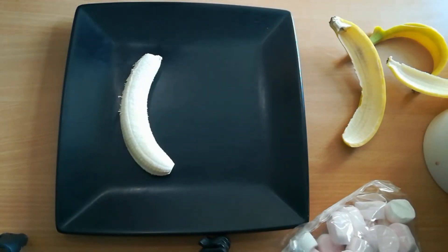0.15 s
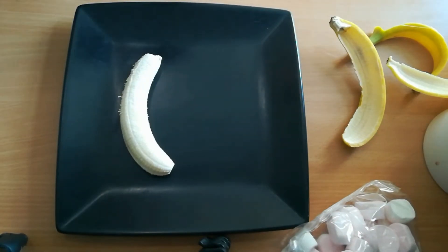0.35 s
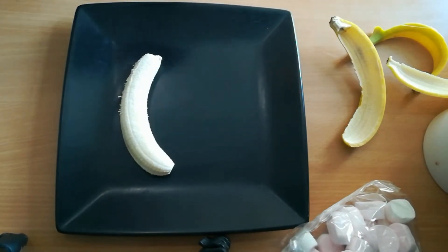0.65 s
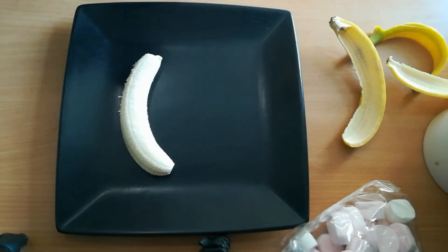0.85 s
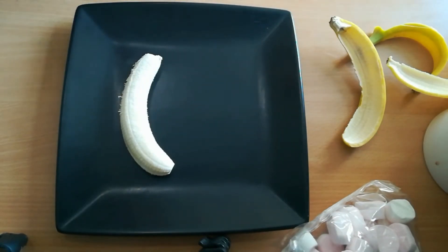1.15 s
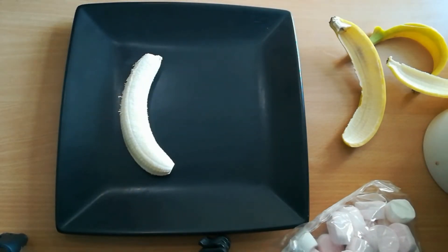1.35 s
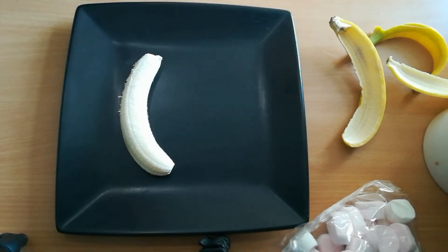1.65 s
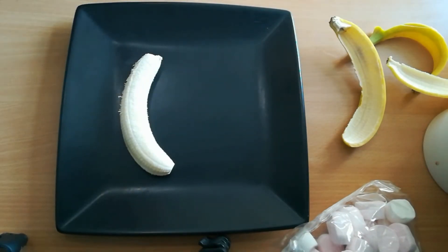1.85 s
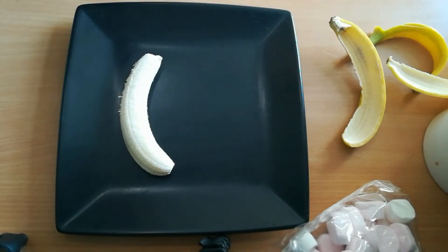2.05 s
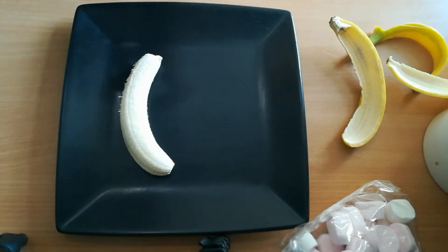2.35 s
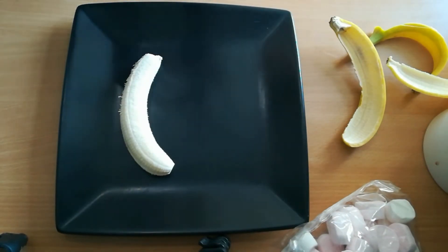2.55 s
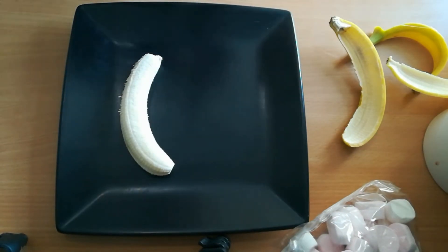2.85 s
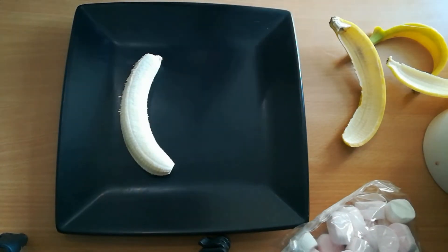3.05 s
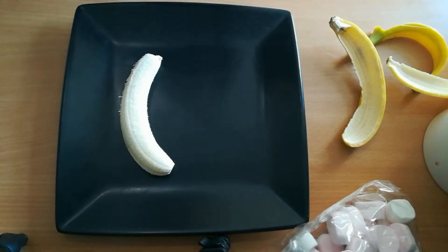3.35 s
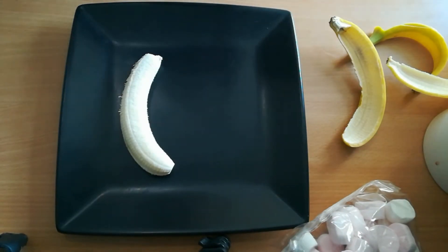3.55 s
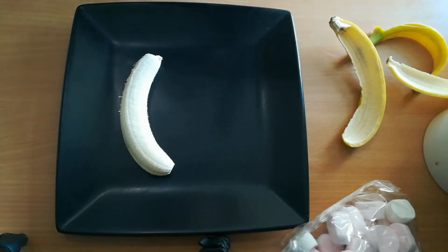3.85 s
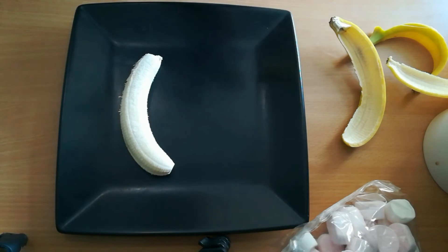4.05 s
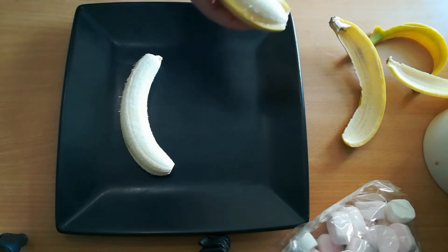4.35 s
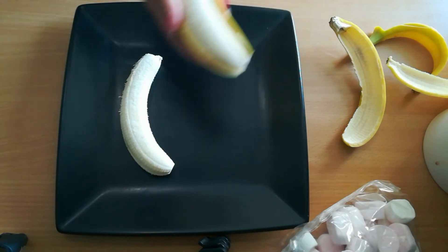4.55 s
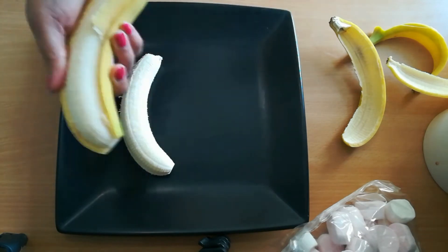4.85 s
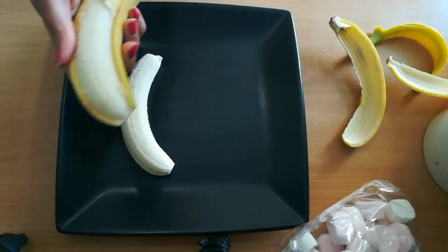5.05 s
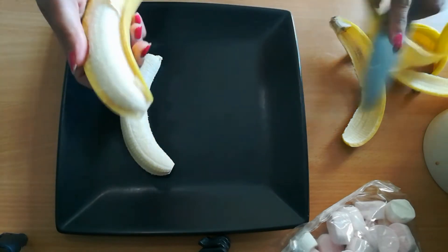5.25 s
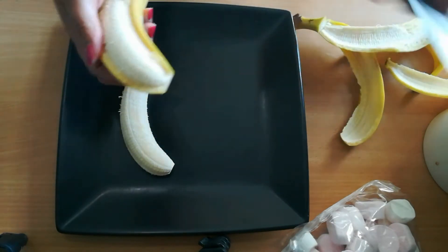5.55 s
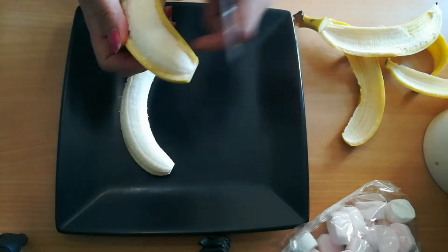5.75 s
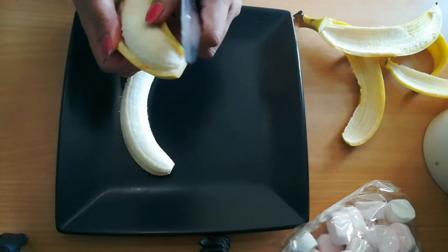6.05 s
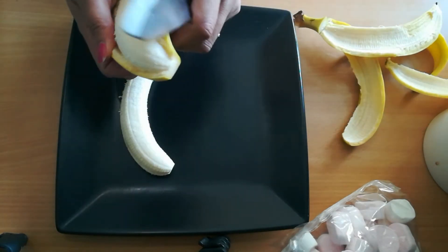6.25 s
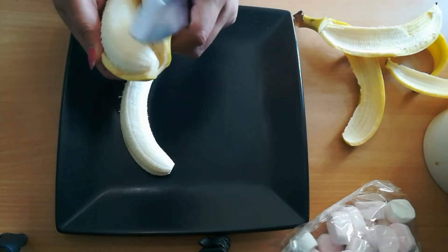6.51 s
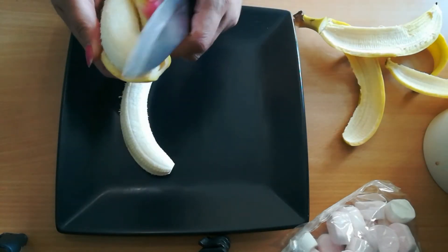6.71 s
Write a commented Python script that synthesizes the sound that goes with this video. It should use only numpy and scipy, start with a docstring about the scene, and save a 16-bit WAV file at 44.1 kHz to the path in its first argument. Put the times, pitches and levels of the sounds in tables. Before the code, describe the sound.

A wooden drawer rumbles open, cutlery clinks, the drawer bangs shut loudly with a jingle, then a banana peel snaps and tears close by.

```python
"""A cutlery drawer is pulled open, a knife is drawn out and the drawer is knocked shut at a kitchen table.
The cutlery jingles and a spoon rocks to rest; close by, a banana skin cracks and tears, a knife ticks
lightly as it is put to the fruit, and an appliance hums faintly. Knocks and snaps are short noise bursts,
wood and steel are decaying modes, rubbing and tearing are random grains under stroke envelopes,
and every handled object sounds in one kitchen reverb."""
import sys
import numpy as np
from scipy import signal
from scipy.fft import rfft, irfft
from scipy.io import wavfile

SR = 44100
rng = np.random.default_rng(int(sys.argv[2]) if len(sys.argv) > 2 else 0)


def transcribe(u):
    """Save the signal u as a 16-bit wav file named by the first command-line argument.

    u: samples, shape (n,) or (channels, n), limited to [-1, 1]; the rate is SR.
    q: integer samples, one column per channel.
    """
    v = np.clip(np.atleast_2d(u).T, -1, 1)
    q = np.round(v * 32767).astype(np.int16)
    wavfile.write(sys.argv[1], SR, q)


N = 303275
TIME = np.arange(N) / SR   # seconds
AGE = TIME[:SR]   # seconds since a blow

# Still air, spectral shape. Each row: frequency in Hz, level in dB.
AIR_COLOUR = [(20, 0), (32, -11.5), (48, -0.5), (75, -12.5), (100, -10.5), (122, -4), (168, -8.5),
              (205, -16.5), (300, -20), (700, -22), (1400, -25.5), (2600, -27), (5000, -31), (15000, -36.5)]
AIR_DB = -65
# Hum of the appliance. Each row: frequency in Hz, RMS level in dB.
HUM_TONES = [(123.8, -70.5), (161.5, -71.5), (877.5, -83.5)]
# Rumble of the furniture under the hands. Each row: peak time in seconds, level in dB, half width in seconds.
RUMBLES = [(0.1, -49, .13), (0.45, -35.5, .08), (0.77, -53, .035), (0.87, -56, .13), (1.11, -62, .09),
           (1.5, -60, .07), (5.33, -62, .03), (6.23, -50.5, .13), (6.52, -53.5, .11), (6.82, -59, .1)]
# Furniture rumble, spectral shape. Each row: frequency in Hz, level in dB.
TABLE_COLOUR = [(12, -30.5), (20, 4), (76, -13), (124, 3), (169, -4.5), (195, -18), (246, -16), (285, -22),
                (826, -27.5), (888, -26.5), (1500, -32.5), (1950, -59), (3300, -120)]

# Reverb decay of the kitchen. Each row: frequency in Hz, T60 in seconds.
ROOM_T60 = [(100, .6), (300, 0.47), (1000, 0.37), (3000, 0.35), (6000, 0.29), (15000, 0.22)]
# Stereo likeness of diffuse sound. Each row: frequency in Hz, left-right correlation from -1 to 1.
STEREO_LIKENESS = [(40, 1), (130, 0.63), (300, .45), (550, -.3), (1200, -0.084), (3000, 0), (15000, 0.18)]

# Drawer hits its frame. Each row: start in seconds, knock in dB, treble relative to knock in dB,
# thump in dB, bass relative to thump in dB, rattle T60 in seconds.
KNOCKS = [(0.138, -16, -11.5, -17, -2, .14), (0.218, -25.5, 1.5, -28, -4, .04),
          (0.306, 6.5, 5, -1.5, -4, .11), (0.319, 1.5, -1.5, 10, -.5, .13), (0.526, -29.5, 3, -19, 0, .035),
          (1.079, -27, 0, -32, -4, .018), (1.761, 11, -5, 3.5, -8, .023), (1.867, 1.5, -10.5, -8, -2, .012),
          (1.888, -.5, -8.5, -9, -2, .02), (1.941, 15.5, 0, 8, 0, .025), (1.964, 6, 8.5, 7, 2, .05),
          (2.011, 1.5, -2, 2, 3, .08), (2.026, 9.5, 7, 2, 5, .08), (2.293, -15.5, -10, -13.5, 0, .04),
          (2.377, -6.5, 5, -14, -1, .022)]
# Drawer rubs along its runners. Each row: start in seconds, length in seconds, level in dB, gain over it in dB.
GLIDES = [(0, .3, -55, 2), (.36, .26, -33, -30), (.74, .68, -58.5, -5)]
# Boom of the carcass. Each row: frequency in Hz, level in dB, T60 in seconds.
CARCASS_MODES = [(52.5, -9.5, 0.23), (89.05, -7, 0.24), (107, -4.5, 0.59), (131, -7, .25),
                 (162.7, -.5, 0.17), (192, -3.5, 0.17), (224.4, 0, 0.27), (243, -4, 0.36), (322, -15, .18),
                 (404, -17, .22), (484, -14, .2)]
# Clack of the front panel. Each row: frequency in Hz, level in dB, T60 in seconds.
PANEL_MODES = [(640, -2.5, 0.046), (731, -3, .06), (785, -1, 0.07), (930, -9.5, .16), (1330, -3.5, .06),
               (1420, -1.5, 0.06)]
# Wooden knock and rub, spectral shape. Each row: frequency in Hz, level in dB.
WOOD_COLOUR = [(100, -9), (230, -1.5), (310, -4.5), (400, -.5), (490, -.5), (720, -3), (950, 0),
               (1300, 3.5), (2000, 1), (3000, -0.5), (4500, 3.5), (6500, -5), (8000, -9), (10000, -14.5),
               (15500, -21)]
SHUT_S = 1.7   # from here on the front panel meets the cabinet
PANEL_OPEN_DB, PANEL_SHUT_DB = -25, -11   # panel ring relative to knock, before and after

# Cutlery jumps in its tray. Each row: start in seconds, level in dB.
CLINKS = [(0.306, -10), (1.475, -22), (1.946, -2.5), (1.9631, 4), (2.0239, -1), (2.031, 1), (2.355, -33.5),
          (2.378, -29)]
# Ring of the cutlery before detuning. Each row: frequency in Hz, level in dB, T60 in seconds.
CUTLERY_MODES = [(2390, -15, .15), (3430, -9, .07), (4335, -8, .16), (5250, -2, .07), (5530, 3, .09),
                 (5720, -2, .12), (6430, -7, .06), (7750, -14, .12), (8780, -3, .11), (10200, -8, .08),
                 (12900, -12, .07), (15100, -9, .06)]

# Spoon is jolted. Each row: start in seconds, level in dB.
JOLTS = [(2.290, -23), (2.376, -21)]
# Ring of the spoon. Each row: frequency in Hz, level in dB, T60 in seconds.
SPOON_MODES = [(1135, -2, .06), (1230, 0, .06), (1275, -1, .06), (1585, -11, .06), (2395, -5, .1),
               (2450, -7, .06), (2570, -12, .05)]
SWING_S, SWING_SHRINK = .168, .89   # first swing; each lasts this share of the one before
SWING_DB, SWING_LOSS_DB = -37, .4   # tap level before the lopsided offset; loss per swing
LOPSIDED_DB = 1.6   # added on the heavy side, taken off on the light side
SPOON_CONTACT_S = .02   # the round bowl rolls onto the tray, so its ring builds up

# Light ticks of the knife. Each row: start in seconds, level in dB, treble relative to it in dB,
# left-right balance in dB.
TICKS = [(1.096, -33, 8, 0), (1.4728, -3.5, -6, -2), (1.475, -4, -5, -1), (1.509, -15, -4.5, -3),
         (1.527, -6, 0, 4), (2.6477, -28.5, 7, 4), (5.081, -38, -14, 4), (5.173, -28, -5.5, 6),
         (5.225, -33, -3, 3), (6.264, -24.5, -12, 0), (6.771, -18, 0, 3.5)]
# Blade scrapes out of the tray, gathering speed: start in seconds, length in seconds, level in dB, gain in dB.
BLADE_SLIDE = (1.475, .056, -37, 12)
# Blade contact, spectral shape. Each row: frequency in Hz, level in dB.
BLADE_COLOUR = [(400, -24), (1000, -23.5), (1600, -14), (2500, -10.5), (4000, -7.5), (5800, 0.5),
                (7500, -1.5), (11000, -1), (15500, -4)]

# Fibres of the skin snap. Each row: start in seconds, level in dB, left-right balance in dB.
SNAPS = [(3.197, -12, 3), (3.203, -11, 3), (3.22, -10, -1), (3.246, -10.5, 2), (3.248, -7.5, 1),
         (3.362, -12, 2), (3.422, -18, -6), (3.429, -13.5, -10), (3.458, -26, 4), (3.489, -15, 6),
         (3.548, -18.5, 7.5), (3.554, -20, -8), (3.652, -26, 10), (3.689, -19, 4), (3.709, -25, 3),
         (3.760, -21, 8), (4.061, -11.5, 4), (4.431, -18, -5), (4.575, -22.5, -8), (4.597, -24, 8)]
SNAP_TREBLE_DB, THIN_IS_BRIGHT = -8, .43   # treble of a 0 dB snap; dB more treble for each dB weaker
# Stalk tears through: start in seconds, length in seconds, level in dB, gain over it in dB.
STALK_TEAR = (3.365, .015, -28.5, 6)
# Pulls on the peel. Each row: start in seconds, length in seconds, level in dB, gain over the pull in dB,
# treble relative to the level in dB.
PULLS = [(3.198, .045, -53, 4, -3), (3.381, .048, -45, 4, -8), (3.56, .08, -59, 0, -1),
         (3.646, .09, -52.5, -1, 0), (3.757, .113, -42.5, -3, 2.5), (3.89, .15, -59.5, 0, 4),
         (4.045, .02, -51, 7, 3), (4.066, .21, -43.5, 0, 2), (4.28, .13, -48, 3, 3),
         (4.415, .07, -41.5, 3.5, .5), (4.495, .105, -45, -6, -2)]
PULL_ATTACK_S, PULL_RELEASE_S = .005, .011   # time constants
PULL_UNEVEN_DB, CATCHES_PER_S = 1.5, 45   # the peel catches and lets go
# A loosened strip rings. Each row: start in seconds, length in seconds, starting pitch in Hz,
# level relative to the pull in dB.
STRIPS = [(3.77, .11, 1780, -21), (3.95, .66, 2060, -22)]
STRIP_SAG_HZ_PER_S, STRIP_WIDTH_HZ = 520, 170   # the pitch drops as the strip lengthens
# Banana skin, spectral shape. Each row: frequency in Hz, level in dB.
PEEL_COLOUR = [(300, -31.5), (900, -30), (1300, -22.5), (1700, -13), (2300, -13.5), (3000, -5.5),
               (4200, -4), (5200, 2), (6500, -2.5), (9000, -6.5), (13000, -5.5), (15500, -8.5)]

CUTOFF_HZ = 15700


def from_db(db):
    """Decibels to amplitude."""
    return 10 ** (np.asarray(db) / 20)


def rms_one(x):
    """Scales a sound to an RMS of one."""
    return x / np.sqrt(np.mean(x ** 2) + 1e-20)


def energy_one(x):
    """Scales a sound to unit energy (per channel on average)."""
    return rms_one(x) / np.sqrt(x.shape[-1])


def at_hz(points, hz):
    """Reads a curve between its points, on a log-frequency axis."""
    f, value = np.transpose(points)
    return np.interp(np.log(np.maximum(hz, 1)), np.log(f), value)


def add(track, s, sound):
    """Mixes a sound in from time s."""
    start = max(round(s * SR), 0)
    track[..., start:start + sound.shape[-1]] += sound[..., :N - start]


def convolve(x, response):
    """Applies an impulse response, keeping the length."""
    return signal.fftconvolve(np.atleast_2d(x), np.atleast_2d(response), axes=-1)[:, :x.shape[-1]]


def colour(x, spectrum, size=8192):
    """Minimum-phase filter of the given spectral shape; white noise keeps its power."""
    shape = from_db(at_hz(spectrum, np.fft.rfftfreq(size, 1 / SR)))
    cepstrum = irfft(np.log(shape))
    # folding the cepstrum makes the filter causal
    cepstrum[1:size // 2] *= 2
    cepstrum[size // 2 + 1:] = 0
    response = irfft(np.exp(rfft(cepstrum)))
    return convolve(x, energy_one(response))


def brighten(x, treble_db, edge_hz=7500):
    """Treble shelf: splits at edge_hz and rescales the upper band."""
    low = signal.sosfilt(signal.butter(3, edge_hz, "low", fs=SR, output="sos"), x)
    high = signal.sosfilt(signal.butter(3, edge_hz, "high", fs=SR, output="sos"), x)
    return low + from_db(treble_db) * high


def pan(balance_db):
    """Left and right gains; positive leans left."""
    return from_db(np.array([[.5], [-.5]]) * balance_db)


def stereo_noise(size):
    """Diffuse stereo noise: most alike in the deep bass, far less alike above."""
    mid, side = rfft(rng.standard_normal((2, size)))
    alike = np.clip(at_hz(STEREO_LIKENESS, np.fft.rfftfreq(size, 1 / SR)), -1, 1)
    shared = np.sqrt(1 + alike) * mid
    opposed = np.sqrt(1 - alike) * side * [[1], [-1]]
    return rms_one(irfft(shared + opposed, size))


def wander(per_s):
    """Random ups and downs, drawn per_s times a second and joined by straight lines."""
    return np.interp(TIME * per_s, np.arange(N), np.clip(rng.standard_normal(N), -2, 2))


def stroke(start, length, db, gained_db, attack_s, release_s):
    """Gain of one stroke: a quick attack, a hold that swells or fades steadily, a release."""
    age = np.maximum(TIME - start, 0)
    hold = from_db(db + gained_db * np.minimum(age / length, 1))
    attack = 1 - np.exp(-age / attack_s)
    release = np.exp(-np.clip((age - length) / release_s, 0, 20))
    return hold * attack * release


def crack(t60, click_db):
    """A sharp contact followed by a quickly dying rattle."""
    burst = energy_one(rng.standard_normal(SR) * from_db(-60 * AGE / t60))
    burst[0] += from_db(click_db)
    return energy_one(burst)


def ring(modes, spread_db):
    """Each blow excites every mode with a strength and sign of its own."""
    sound = np.zeros(SR)
    for hz, db, t60 in modes:
        sign = rng.choice([-1, 1])
        strength_db = db + spread_db * rng.standard_normal()
        sound += sign * from_db(strength_db - 60 * AGE / t60) * np.sin(2 * np.pi * hz * AGE)
    return energy_one(sound)


def grains(per_s, spread_db, clump_db=0, clumps_per_s=150):
    """Tiny ruptures at random moments, a few much larger than the rest; clump_db swells them in clumps."""
    sizes = from_db(spread_db * np.minimum(rng.exponential(1, N), 4)) * rng.choice([-1, 1], N)
    clumps = from_db(clump_db * wander(clumps_per_s))
    happens = rng.random(N) < per_s / SR
    return rms_one(sizes * clumps * happens)


def gliding_resonance(x, hz, width_hz):
    """One resonance whose centre follows hz: shift down to 0 Hz, smooth, shift back up."""
    carrier = np.exp(2j * np.pi * np.cumsum(hz) / SR)
    r = np.exp(-np.pi * width_hz / SR)
    return rms_one((signal.lfilter([1], [1, -r], x / carrier) * carrier).real)


def kitchen(x, wet_db, lag_ms, build_s=.004):
    """Direct sound, later on the left by lag_ms, and a diffuse tail whose treble dies first."""
    noise, hz = rfft(stereo_noise(SR)), np.fft.rfftfreq(SR, 1 / SR)
    centres = [f for f, t60 in ROOM_T60]
    tail = np.zeros((2, SR))
    # overlapping bands, each with its own decay
    for share, (f, t60) in zip(np.eye(len(centres)), ROOM_T60):
        band = irfft(noise * at_hz(list(zip(centres, share)), hz), SR)
        tail += band * from_db(-60 * AGE / t60)
    tail = energy_one(tail * (1 - np.exp(-AGE / build_s)))
    left, right = np.broadcast_to(x, (2, N))
    lag = round(lag_ms * SR / 1000)
    direct = np.array([np.roll(left, lag), right])
    return direct + from_db(wet_db) * convolve(x, tail)


def background():
    """Still air as soft noise, a motor's hum as steady sines, and furniture rumble as swelling low noise."""
    air = from_db(AIR_DB) * colour(stereo_noise(N), AIR_COLOUR)
    hum = np.zeros(N)
    for hz, db in HUM_TONES:
        hum += from_db(db) * np.sqrt(2) * np.sin(2 * np.pi * (hz * TIME + rng.random()))
    swells = sum(from_db(db) * np.exp(-((TIME - s) / width) ** 2) for s, db, width in RUMBLES)
    return air + hum + swells * colour(stereo_noise(N), TABLE_COLOUR)


def drawer():
    """Wood rubs and knocks; the front panel clacks as it meets the cabinet, and the heavy carcass booms."""
    knocks, panel, thumps = np.zeros((3, N))
    swing = 1 - np.exp(-AGE / .004)   # the carcass takes a moment to move
    for s, knock_db, treble_db, thump_db, bass_db, rattle_s in KNOCKS:
        knock = brighten(crack(rattle_s, click_db=-8.5), treble_db)
        add(knocks, s, from_db(knock_db) * knock)
        panel_db = PANEL_SHUT_DB if s > SHUT_S else PANEL_OPEN_DB
        add(panel, s, from_db(knock_db + panel_db) * ring(PANEL_MODES, spread_db=1))
        boom = ring(CARCASS_MODES, spread_db=1.5) * swing
        # bass_db lands only below 160 Hz: the shelf takes it off again above
        add(thumps, s, from_db(thump_db + bass_db) * brighten(boom, -bass_db, edge_hz=160))
    gliding = sum(stroke(*glide, attack_s=.02, release_s=.02) for glide in GLIDES)
    friction = grains(per_s=4000, spread_db=3, clump_db=3, clumps_per_s=25)
    rubbing = brighten(gliding * friction, treble_db=-14, edge_hz=900)
    wood = (colour(knocks + rubbing, WOOD_COLOUR) + panel) * pan(-1.7)
    return kitchen(wood, wet_db=1.5, lag_ms=.3, build_s=.0034) + kitchen(thumps, wet_db=-12, lag_ms=.1)


def cutlery():
    """Six like pieces jingle together within 4 ms, each tuned a little differently."""
    steel = np.zeros(N)
    for s, db in CLINKS:
        for detune, delay in zip(rng.normal(1, .015, size=6), np.linspace(0, .004, 6)):
            piece = [(hz * detune, level, t60) for hz, level, t60 in CUTLERY_MODES]
            add(steel, s + delay, from_db(db) * ring(piece, spread_db=3.5))
    return kitchen(brighten(steel, treble_db=-5.5), wet_db=2.5, lag_ms=-.1)


def spoon():
    """The jolted spoon rocks in ever shorter, weaker swings; each ends in a small tap."""
    taps, k = np.zeros(N), np.arange(8)
    times = JOLTS[-1][0] + np.cumsum(SWING_S * SWING_SHRINK ** k)
    levels = SWING_DB - SWING_LOSS_DB * k + LOPSIDED_DB * (-1) ** k
    for s, db in [*JOLTS, *zip(times, levels)]:
        tap = ring(SPOON_MODES, spread_db=1) * (1 - np.exp(-AGE / SPOON_CONTACT_S))
        add(taps, s, from_db(db) * energy_one(tap))
    return kitchen(taps * pan(-2), wet_db=1, lag_ms=.05)


def knife():
    """The blade scrapes out of the tray as dense grains, and ticks against things."""
    ticks = np.zeros((2, N))
    for s, db, treble_db, balance_db in TICKS:
        tick = crack(t60=.02, click_db=-8)
        add(ticks, s, from_db(db) * pan(balance_db) * brighten(tick, treble_db))
    sliding = stroke(*BLADE_SLIDE, attack_s=.002, release_s=.002) * grains(per_s=9000, spread_db=3)
    near = kitchen(colour(ticks, BLADE_COLOUR), wet_db=-1, lag_ms=-.2)
    return near + kitchen(colour(sliding, BLADE_COLOUR), wet_db=-6, lag_ms=.3)


def peel():
    """The stalk gives way, bundles of fibres snap one by one, and the peel comes off in fine, uneven tearing."""
    snaps, tearing, pull, strip = np.zeros((2, N)), np.zeros(N), np.zeros(N), np.zeros(N)
    for s, db, balance_db in SNAPS:
        snap = brighten(crack(t60=.016, click_db=-10), SNAP_TREBLE_DB - THIN_IS_BRIGHT * db)
        add(snaps, s, from_db(db) * pan(balance_db) * snap)
    stalk = stroke(*STALK_TEAR, attack_s=.001, release_s=.001) * grains(per_s=13000, spread_db=3.5)
    ruptures = grains(per_s=2800, spread_db=3.5, clump_db=2.5)
    ruptures = ruptures * from_db(PULL_UNEVEN_DB * wander(CATCHES_PER_S))
    for start, length, db, gained_db, treble_db in PULLS:
        effort = stroke(start, length, db, gained_db, PULL_ATTACK_S, PULL_RELEASE_S)
        tearing += effort * brighten(ruptures, treble_db)
        pull += effort
    # the strips ring only while the peel is being pulled
    for start, length, hz, db in STRIPS:
        pitch = hz - STRIP_SAG_HZ_PER_S * np.clip(TIME - start, 0, length)
        loose = stroke(start, length, db, 0, PULL_ATTACK_S, PULL_RELEASE_S)
        strip += loose * pull * gliding_resonance(ruptures, pitch, STRIP_WIDTH_HZ)
    skin = colour(snaps + stalk, PEEL_COLOUR) + (colour(tearing, PEEL_COLOUR) + strip) * pan(2.3)
    return kitchen(skin, wet_db=-5, lag_ms=-.05, build_s=.002)


def scene():
    """All layers, from the room to the fruit."""
    return background() + drawer() + cutlery() + spoon() + knife() + peel()


def record(dry):
    """Peaks stop at full scale and a steep low-pass cuts the top."""
    low_pass = signal.ellip(12, .2, 90, CUTOFF_HZ, fs=SR, output="sos")
    return signal.sosfilt(low_pass, np.clip(dry, -1, 1))


dry = scene()
out = record(dry)
transcribe(out)
```